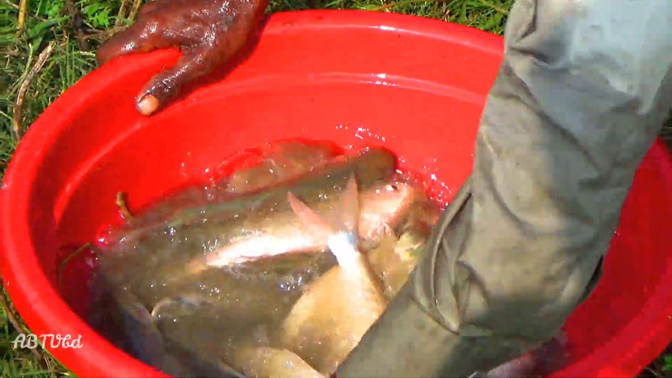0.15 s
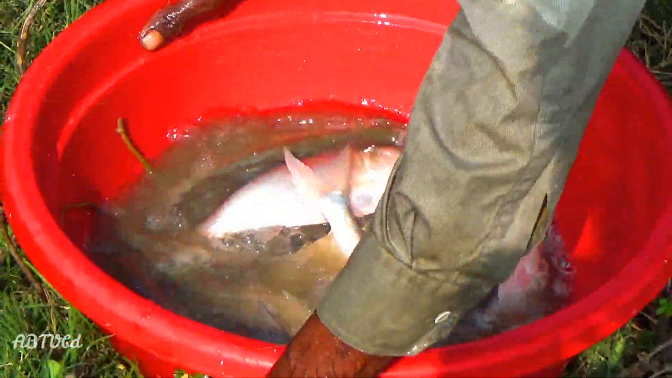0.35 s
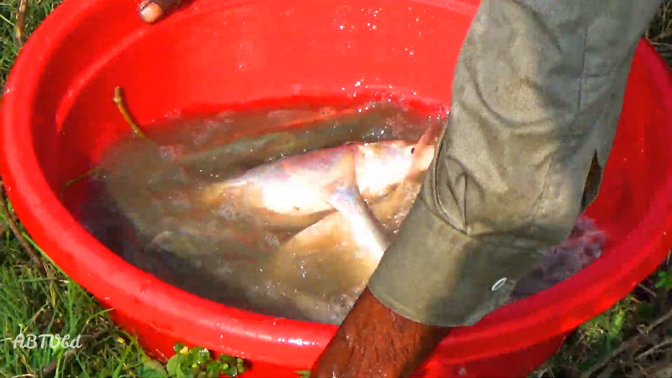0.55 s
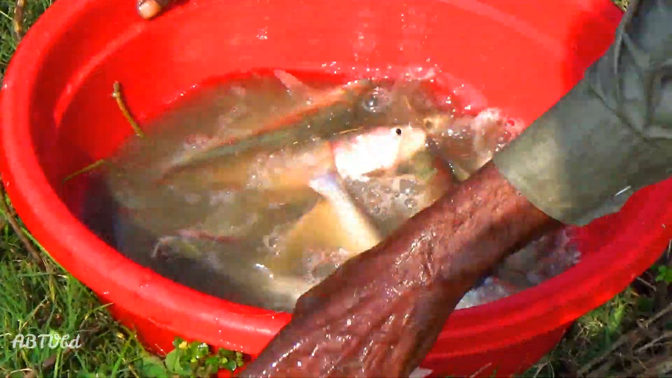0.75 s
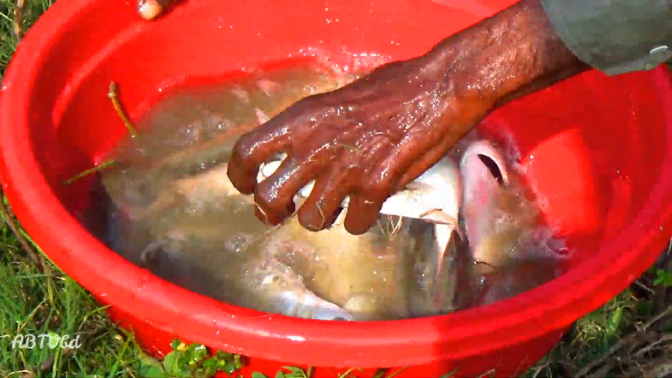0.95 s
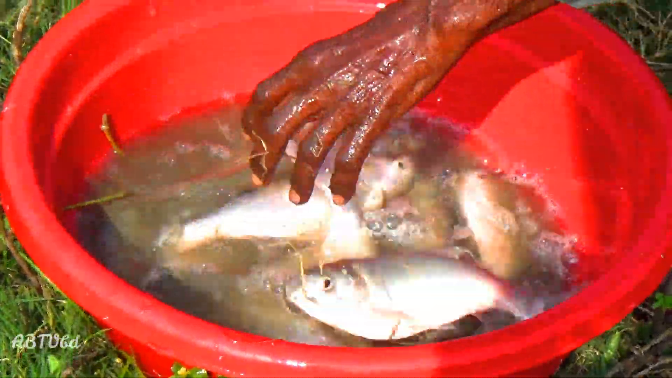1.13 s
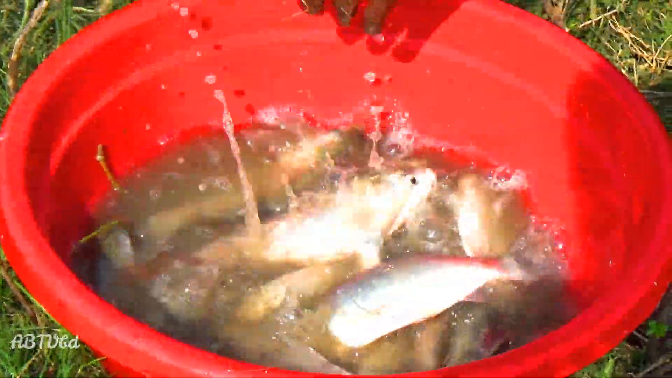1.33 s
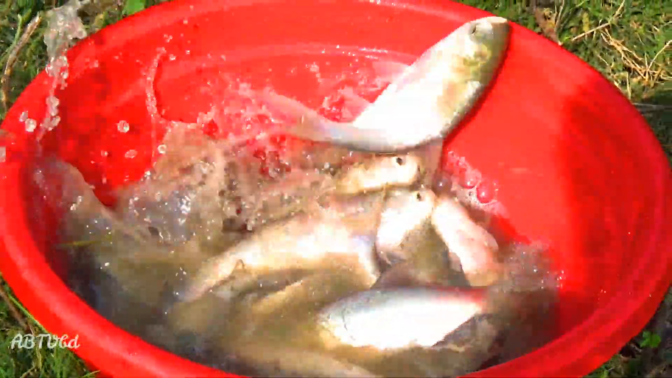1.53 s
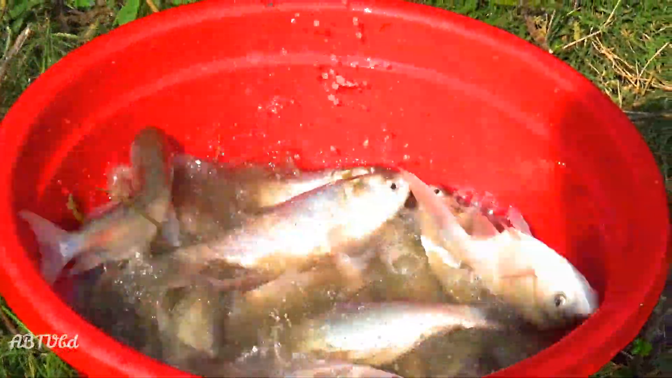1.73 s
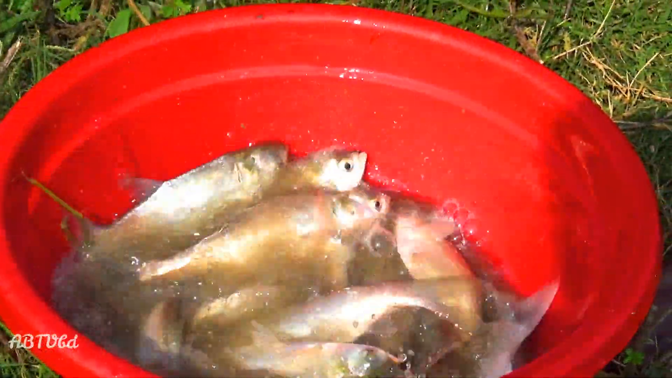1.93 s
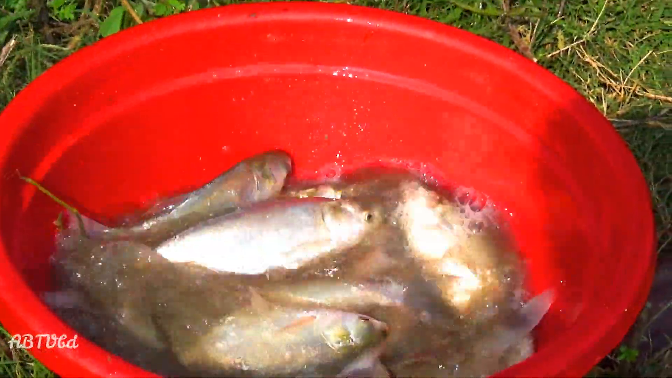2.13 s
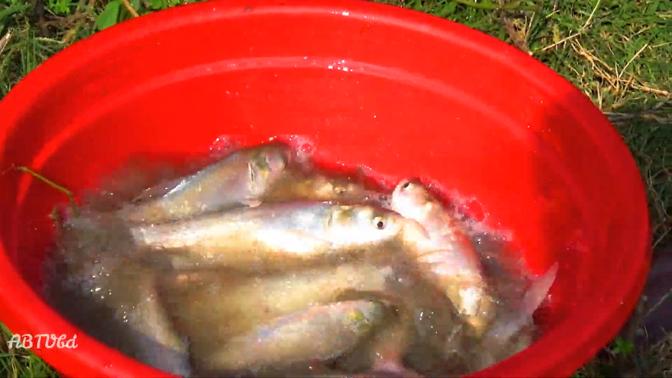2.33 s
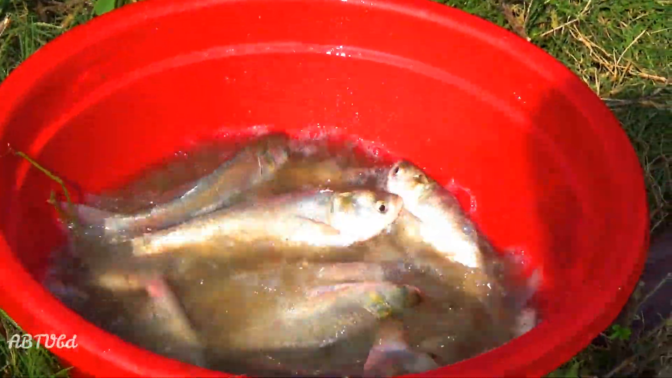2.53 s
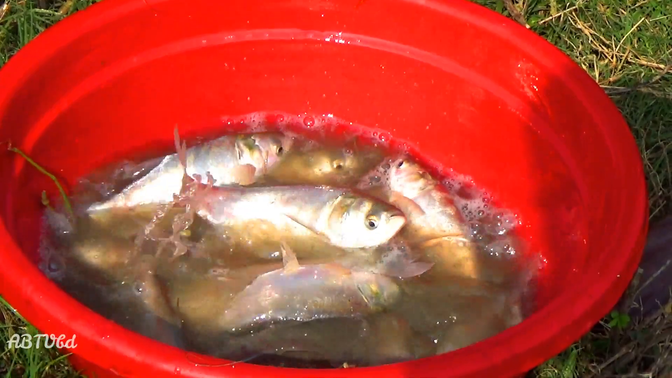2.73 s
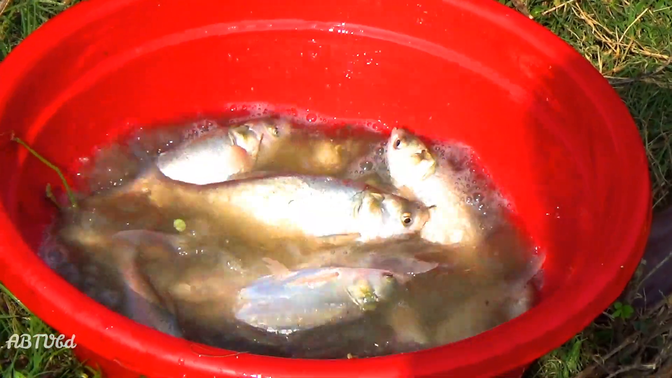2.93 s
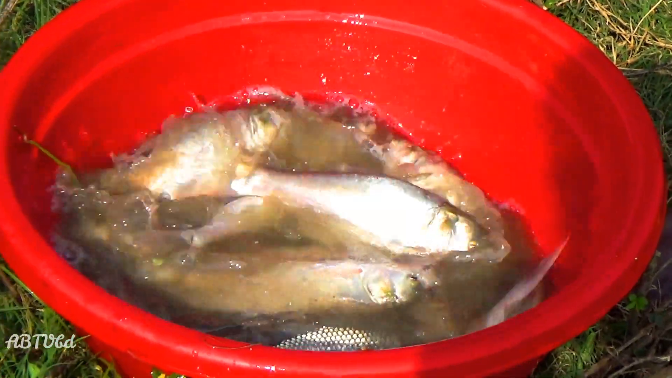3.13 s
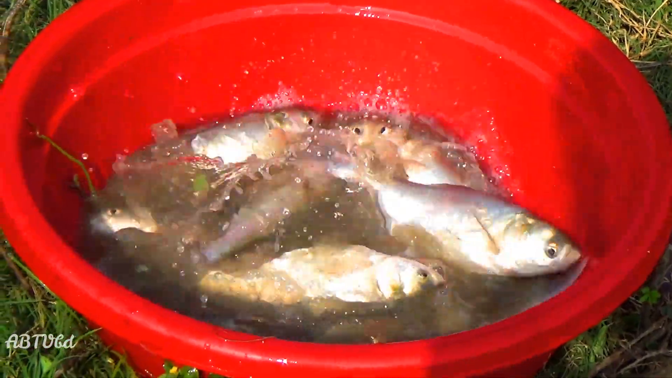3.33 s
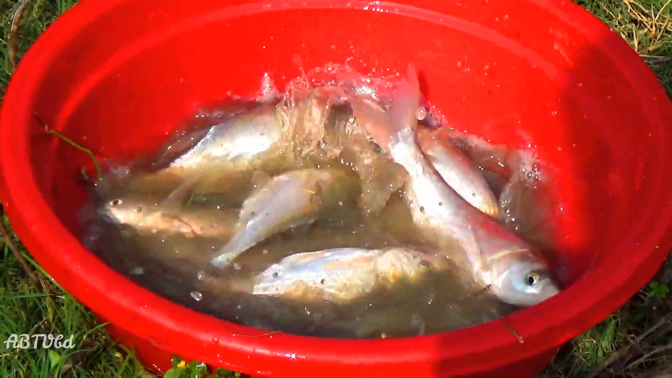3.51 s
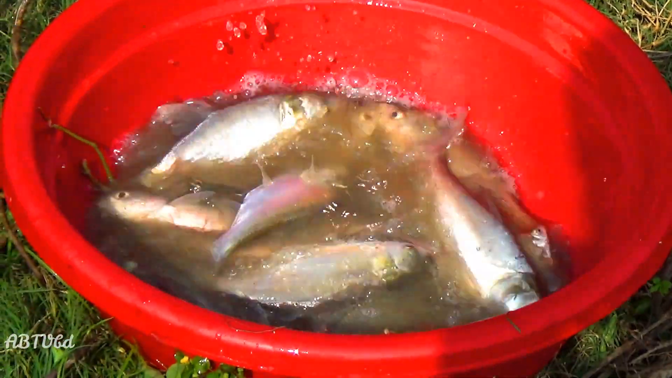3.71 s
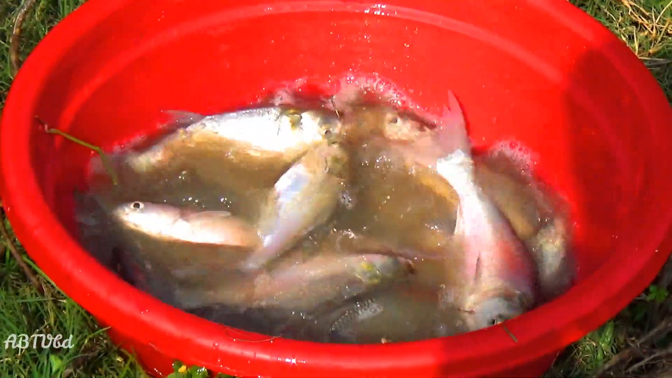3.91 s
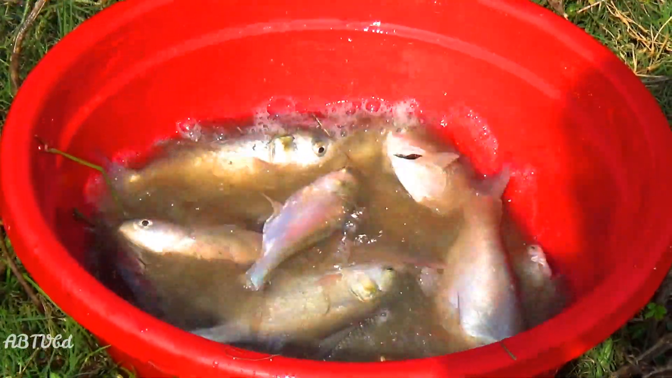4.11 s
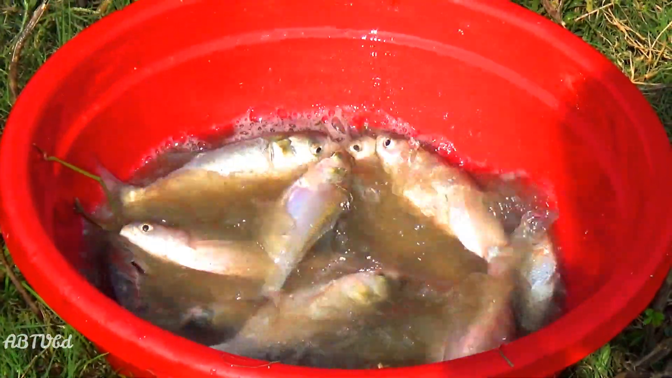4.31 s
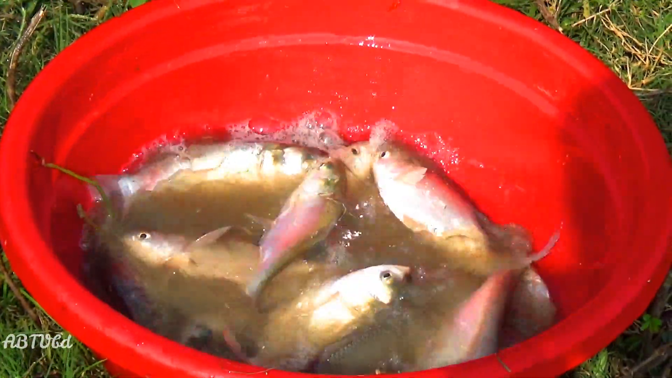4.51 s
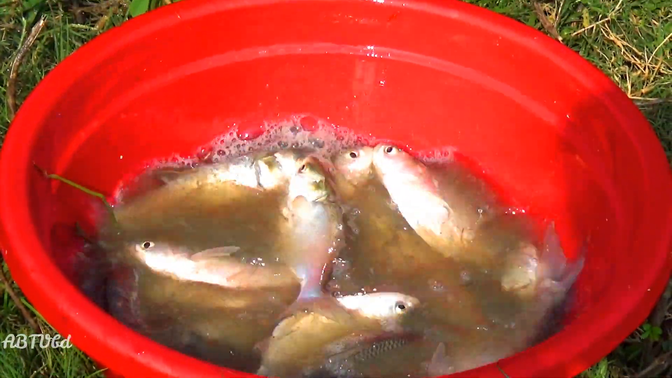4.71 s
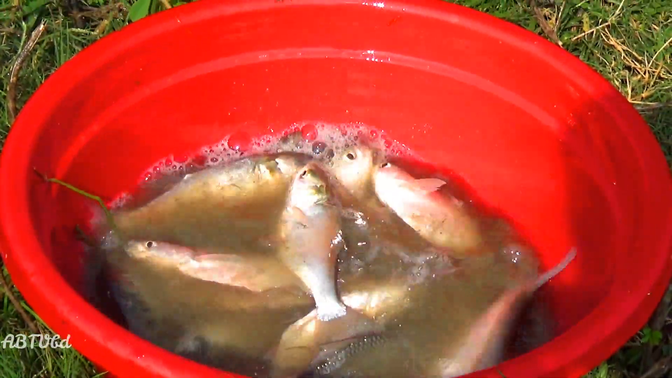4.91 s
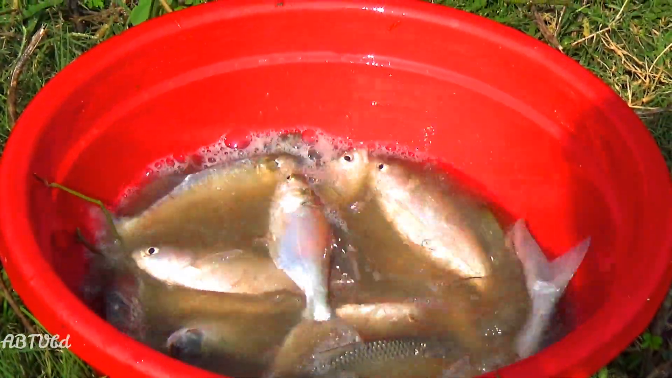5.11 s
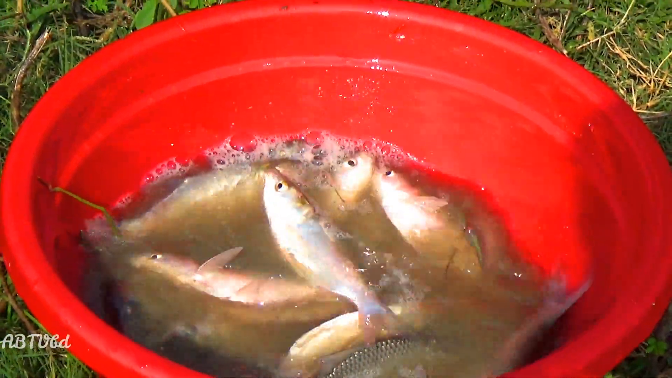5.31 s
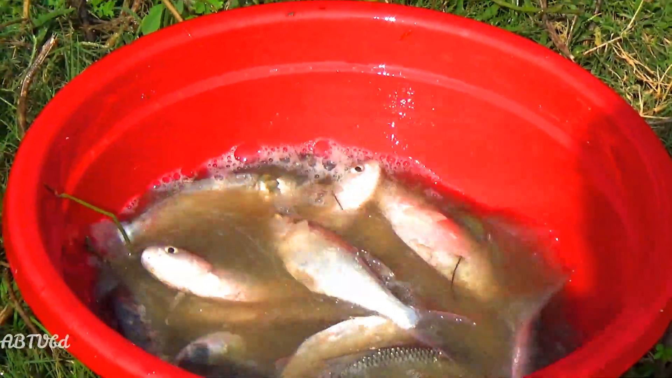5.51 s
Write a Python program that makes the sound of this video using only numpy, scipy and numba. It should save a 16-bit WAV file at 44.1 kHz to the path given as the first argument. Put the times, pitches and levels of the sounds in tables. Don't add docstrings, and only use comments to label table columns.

```python
import sys
import numpy as np
from scipy import signal
from scipy.fft import rfft, irfft, next_fast_len
from scipy.io import wavfile
from scipy.ndimage import uniform_filter1d
from numba import njit

SR = 44100
rng = np.random.default_rng(int(sys.argv[2]) if len(sys.argv) > 2 else 0)


def to_wav(s):
    ch = np.atleast_2d(s).T
    pcm = np.round(np.clip(ch, -1, 1) * 32767)
    wavfile.write(sys.argv[1], SR, pcm.astype(np.int16))


def makeup_ratio(level_db):
    decades = np.asarray(level_db, float) / 20
    return 10 ** decades


N = 244965


def unit(x):
    return x / np.sqrt(np.mean(x ** 2))


def colour(x, points):
    size = next_fast_len(N)
    hz, db = np.transpose(points)
    bin_hz = np.arange(size // 2 + 1) * SR / size
    gain = makeup_ratio(np.interp(np.log(bin_hz + 1), np.log(hz), db, -90, -90))
    return unit(irfft(rfft(x, size) * gain, size)[..., :N])


def curves(table):
    s, *columns = np.transpose(table)
    return [np.interp(np.arange(N) / SR, s, c) for c in columns]


def walk(rate_hz):
    hold = int(SR / rate_hz)
    levels = np.repeat(rng.standard_normal(N // hold + 1), hold)
    return 1.7 * uniform_filter1d(uniform_filter1d(levels, hold), hold)[:N]


def steady(x, span_s):
    span = int(span_s * SR)
    power = uniform_filter1d(uniform_filter1d(np.mean(x ** 2, axis=0), span), span)
    return x / np.sqrt(power)


def hiss(side, side_hz):
    mid, other = rng.standard_normal((2, N))
    other = signal.sosfilt(signal.butter(1, side_hz, fs=SR, output="sos"), other)
    return mid + side * other * np.array([[1], [-1]])


def resonance(x, hz, width_hz):
    f = np.arange(1, x.shape[1] // 2 + 2) * SR / x.shape[1]
    return irfft(rfft(x) / (1 + 1j * (f - hz ** 2 / f) / width_hz), x.shape[1])


def place(rows, s, db, pan_db):
    out = np.zeros((2, N + rows.shape[1]))
    gains = makeup_ratio(db) / np.abs(rows).max(axis=1)
    for row, start_s, gain, pan in zip(rows, s, gains, pan_db):
        i = int(start_s * SR)
        out[:, i:i + len(row)] += row * gain * makeup_ratio([[pan / 2], [-pan / 2]])
    return out[:, :N]


# time in seconds, rumble in dB, flutter in dB above the rumble.
GUSTS = [(0.0, -34, 3.5), (0.1, -30, 0), (0.3, -30.5, -3.5), (0.85, -31.5, -6), (1.1, -38.5, 1.5),
         (1.42, -29, -7), (1.75, -32.5, -0.5), (1.92, -30, -4), (2.44, -30.5, -3.5), (2.54, -36, -4.5),
         (2.87, -42.5, -8), (3.3, -28.5, -7), (3.65, -43.5, -9.5), (3.81, -34.5, -8.5), (4.1, -46.5, -6.5),
         (4.6, -42.5, -8.5), (5.0, -40, -7), (5.55, -41.5, -13.5)]
# Hz, dB per Hz.
RUMBLE = [(11, -45), (18, -8.5), (64, 5.5), (97, 2), (130, -8.5), (170, -66), (290, -120)]
# Hz, dB per Hz.
FLUTTER = [(59, -36), (100, -1.5), (132, -0.5), (292, -19.5), (441, -30.5), (600, -35.5), (780, -37),
           (1320, -120)]
# start in seconds, peak in dB, pitch in Hz, left minus right in dB.
BUMPS = [
    (0.07, -28, 173, -2),
    (.845, -17.5, 94, 3),
    (.884, -18.5, 110, -2),
    (4.58, -28.5, 199, 1),
    (1.668, -21, 164, -2),
    (1.788, -16, 171, 12),
    (2.506, -23.5, 172, -7),
]


def wind():
    eddy_lag_s = 0.0011
    rumble_db, flutter_db = curves(GUSTS)
    rumble = steady(colour(hiss(0.2, 2000), RUMBLE), 0.07)
    flutter = steady(colour(hiss(0.51, 2000), FLUTTER), 0.058)
    flutter = flutter * makeup_ratio(flutter_db + 1.54 + 1.91 * walk(22.546))
    right, left = (rumble + flutter) * makeup_ratio(rumble_db + 1.2 + 1.6 * walk(16))
    left = np.interp(np.arange(N) - eddy_lag_s * SR, np.arange(N), left)
    s, db, hz, pan_db = np.transpose(BUMPS)
    turn = hz[:, None] * np.arange(1024) / SR
    bump = np.sin(2 * np.pi * turn) * turn * np.exp(-turn / 0.28)
    return np.array([left, right]) + place(bump, s, db - 0.5, pan_db)


# start in seconds, hold in seconds, spray in dB, gurgle in dB.
BOUTS = [(-.02, 0.097, -44, -46), (0.289, 0.049, -45, -59), (1.08, 0.015, -56, -46),
         (1.185, 0.039, -41, -42), (1.302, 0.088, -46, -55), (1.384, 0.019, -43, -37),
         (1.456, 0.15, -41, -48), (1.68, 0.21, -44.5, -41.5), (1.903, 0.2, -48.5, -55.5),
         (2.403, 0.41, -56.5, -62), (2.872, 0.28, -46.5, -56), (3.192, 0.11, -50.5, -57),
         (3.365, 0.05, -38, -46.5), (3.506, 0.11, -48.5, -49), (3.782, 0.076, -50, -58),
         (3.996, 0.11, -47.5, -58), (4.138, 0.052, -43.5, -51.5), (4.293, 0.15, -48, -61),
         (4.606, 0.12, -48, -54.5), (4.768, 0.11, -54, -50.5), (4.945, 0.1, -49.5, -56),
         (5.177, 0.052, -50, -50.5), (5.44, 0.024, -47.5, -54), (5.51, .1, -41.5, -50.5)]
# start in seconds, hold in seconds, spray in dB, gurgle in dB.
BEATS = [(0.56, 0.207, -52, -76), (1.447, 0.014, -28, -34), (1.476, 0.047, -29.5, -28.5),
         (1.561, 0.01, -28.5, -30.5), (1.606, 0.019, -25, -29.5), (1.657, 0.012, -31.5, -35),
         (1.708, 0.016, -33, -35), (1.758, 0.014, -32.5, -41), (1.788, 0.029, -33.5, -33.5),
         (1.824, 0.011, -35.5, -39), (1.856, 0.0075, -37, -36), (3.201, .018, -40, -45),
         (3.289, 0.02, -39, -48.5), (3.404, 0.047, -50, -40), (3.507, 0.013, -36, -39)]


def stirring(broken):
    rise_db_s, foam_fall_db_s, drop_fall_db_s, beat_fall_db_s = 424, 57, 115, 553
    calm_db = -58
    s, hold, spray_db, gurgle_db = (c[:, None] for c in np.transpose(BOUTS + BEATS))
    grid_s = np.arange(0, N, 64) / SR
    t = grid_s - s
    ends = np.clip((s + hold) * SR, 0, N - 1).astype(int)
    fall = foam_fall_db_s + (drop_fall_db_s - foam_fall_db_s) * broken[ends]
    fall[len(BOUTS):] = beat_fall_db_s
    shape = makeup_ratio(2 * (rise_db_s * np.minimum(t, 0) - fall * np.maximum(t - hold, 0)))
    levels = []
    for db in (spray_db, gurgle_db):
        power = (shape * makeup_ratio(2 * db)).sum(axis=0) + makeup_ratio(2 * calm_db)
        levels.append(np.interp(np.arange(N) / SR, grid_s, 10 * np.log10(power)))
    return levels


@njit
def grains(start, hz, turns, big, glide, pan):
    out = np.zeros((2, N))
    for k in range(len(start)):
        z = big[k] + 0j
        n = int(turns[k] * SR / hz[k]) + 2
        step = np.exp((2j * np.pi - 1 / turns[k]) * hz[k] / SR)
        climb = np.exp(2j * np.pi * hz[k] / SR * glide / n)
        for i in range(start[k], min(start[k] + 5 * n, N)):
            z = z * step
            step = step * climb
            out[0, i] += z.imag * (1 + pan[k])
            out[1, i] += z.imag * (1 - pan[k])
    return out


def froth(count, low_hz, high_hz, turns, scatter_db, glide, wide):
    u = rng.random((count, 5)).T
    start = (u[0] * N).astype(np.int64)
    hz = low_hz * (high_hz / low_hz) ** u[1]
    big = makeup_ratio(-scatter_db * np.log(0.995 * u[2] + 0.005)) * hz
    pan = wide * np.sqrt(low_hz / hz) * (2 * u[4] - 1)
    return unit(grains(start, hz, turns * (0.66 + u[3]), big, glide, pan))


# time in seconds, share 0-1.
BROKEN = [
    (0, 0.27),
    (.25, 0.24),
    (1.05, 0.5),
    (1.25, 0.9),
    (1.45, 0.85),
    (1.85, 0.74),
    (2.95, 0.76),
    (3.3, 0.86),
    (5.55, 0.82),
]
# Hz, dB per Hz.
SPRAY = [(1760, -26), (3000, -7.5), (3630, -7), (4460, -3), (6740, -3), (9740, 1.5), (12100, -12),
         (15300, -24), (16400, -39)]
# Hz, dB per Hz.
FOAM = [(1470, -56), (2500, -31), (4470, -8), (7000, -3), (9000, 3), (11500, -3.5), (16400, -19)]
# Hz, dB per Hz.
GURGLE = [(310, 0), (520, -11), (707, -4.5), (1160, -7.5), (1650, -5), (2520, -2.5), (4000, -14.5),
          (5200, -12), (8800, -120)]


def churn():
    (broken,) = np.clip(curves(BROKEN), 0, 1)
    spray_db, gurgle_db = stirring(broken)
    patch = walk(60) * broken
    drops = froth(count=9000, low_hz=2500, high_hz=17400, turns=4.8, scatter_db=3.1, glide=0.085, wide=0.33)
    drops = colour(drops, SPRAY)
    foam = colour(hiss(0.25, 5000), FOAM) * makeup_ratio(0.9 * walk(30))
    spray = np.sqrt(broken) * drops + np.sqrt(1 - broken) * foam
    gurgle = froth(count=5000, low_hz=500, high_hz=6000, turns=3.2, scatter_db=2.2, glide=0.05, wide=0.8)
    gurgle = colour(gurgle + 0.98 * hiss(0.27, 2000), GURGLE)
    spray_db = spray_db + 2.1 * patch
    gurgle_db = gurgle_db + 1.4 * patch + 1.2 * walk(25) - 0.5
    return spray * makeup_ratio(spray_db) + gurgle * makeup_ratio(gurgle_db)


# start in seconds, peak in dB.
SNAPS = [(0.033, -15.5), (5.4645, -21), (1.172, -15), (1.2392, -14), (1.559, -6.5), (1.667, -16),
         (1.8657, -6), (2.1821, -14), (2.2176, -9), (2.5285, -14), (3.1692, -19), (3.1887, -18),
         (3.4075, -12), (3.4726, -14), (2.565, -26.5), (3.5705, -12), (3.8274, -15), (3.9666, -10.5),
         (3.977, -11.5), (3.941, -24), (3.999, -23), (4.011, -22), (4.107, -21), (4.199, -12.5),
         (4.24, -22), (4.286, -17), (4.344, -20.5), (4.1798, -8.5), (4.017, -12), (4.0343, -8),
         (4.0887, -6.5), (4.1288, -16), (4.28, -12), (4.3154, -12), (4.715, -17.5), (5.066, -17.5),
         (5.1795, -6), (5.183, -10), (5.2236, -10.5)]
# peak time in seconds, peak in dB, centre in Hz,
# gap in seconds, fall in dB a crack.
FLICKS = [(1.188, -7, 8000, 0.005, 3.5), (1.394, -10, 8350, 0.0056, 15), (1.51, -8, 7250, 0.003, 3.5),
          (1.609, -8, 8800, 0.0033, 3), (1.631, -11, 6860, 0.0056, 5.5), (1.679, -7, 6560, 0.0062, 17),
          (1.7777, -9.5, 7800, 0.0052, 3.5), (1.8079, -12, 4700, 0.012, 5), (2.3381, -15, 6300, 0.0031, 9),
          (2.907, -16.5, 7050, 0.0037, 18), (3.0523, -14, 8250, 0.011, 9), (3.137, -8.5, 9900, 0.0045, 17),
          (3.214, -11, 7600, .0026, 20), (3.373, -3, 9300, 0.0026, 15), (3.4164, -10, 7350, 0.004, 16),
          (3.6058, -13, 5500, .0035, 12), (4.048, -4.5, 7400, 0.0033, 4), (4.076, -8, 7860, 0.0056, 19),
          (4.1396, -8.5, 8060, 0.0069, 19), (4.1696, -3.5, 7040, 0.01, 9), (4.668, -11.5, 8300, 0.0066, 20),
          (5.203, -8.5, 8600, .004, 15), (5.4994, -6, 5940, 0.0054, 4.5), (5.5464, -8, 8200, 0.0087, 9)]
# start in seconds, peak in dB, centre in Hz.
DROPS = [(5.4848, -22, 8000), (0.543, -24.5, 6800), (0.692, -29, 3730), (1.2932, -18.5, 4800),
         (1.39, -12, 6250), (1.836, -9.5, 6200), (2.2849, -18.5, 7500), (2.3016, -20, 7600),
         (2.438, -20.5, 8650), (2.4608, -24, 8600), (2.5385, -22, 5660), (2.6828, -22, 6700),
         (3.0956, -22, 7400), (3.241, -23, 6040), (3.6407, -20.5, 4900), (3.6716, -18.5, 8750),
         (3.814, -22, 5900), (4.1167, -16, 8700), (4.2317, -19, 8700), (2.412, -26, 8000),
         (4.4195, -18, 8000), (4.4768, -22.5, 5230), (4.536, -19.5, 7600), (4.592, -16, 6560),
         (4.732, -18, 9000), (4.9485, -19, 5770), (4.9836, -19.5, 7900), (5.218, -18, 9500),
         (5.399, -25, 8360), (5.4566, -21.5, 7330)]
# start in seconds, peak in dB, pitch in Hz, peak of the crack on top in dB.
SLAPS = [(.191, -24, 3520, -18), (.224, -23, 1200, -18.5), (.355, -26, 1996, -21), (.805, -35, 1320, -28),
         (.854, -39.5, 2270, -31), (1.1845, -27, 4740, -8), (1.399, -21, 2670, -26),
         (1.435, -26, 1500, -26), (1.442, -28.5, 810, -32), (1.511, -19.5, 1940, -14),
         (1.516, -31, 694, -8), (1.608, -25.5, 1010, -15), (1.707, -24.5, 373, -30),
         (1.806, -24, 3070, -25), (1.864, -24, 890, -15), (3.2095, -26, 3090, -30),
         (3.214, -26.5, 2410, -17), (3.32, -34, 2250, -32), (3.37, -29.5, 2580, -23),
         (3.4285, -25, 1390, -28), (3.5222, -28.5, 2580, -26), (3.697, -33, 3240, -17),
         (3.854, -29.5, 2520, -22), (3.947, -33, 2600, -17.5), (4.038, -36.5, 1135, -28),
         (4.495, -40, 2870, -34), (3.302, -28, 2500, -26), (5.043, -46, 2070, -13),
         (5.278, -30.5, 1540, -30), (5.511, -33, 2100, -22)]


def cracks():
    lead_db, slap_crack_late_s, slap_crack_hz = -7.5, 0.001168, 5500
    s, db, hz, gap_s, fall_db = np.transpose(FLICKS)
    k = np.arange(-1, 4)[:, None]
    run_s = s + k * gap_s
    run_db = db + np.where(k < 0, lead_db, -k * fall_db)
    run_hz = hz * (1 + 0.061 * (k != 0) * rng.standard_normal((len(s), 5)).T)
    runs = np.reshape((run_s, run_db, run_hz), (3, -1))
    film_hz = 8600 * (1 + 0.12 * rng.standard_normal(len(SNAPS)))
    slap_s, _, _, top_db = np.transpose(SLAPS)
    tops = slap_s + slap_crack_late_s, top_db, np.full(len(SLAPS), slap_crack_hz)
    rows = np.hstack([runs, [*np.transpose(SNAPS), film_hz], np.transpose(DROPS), tops])
    return np.minimum(rows, [[N / SR], [0], [SR / 4]])


def snaps():
    mic_hz, mic_width_hz, mic_band_hz = 9600, 2500, (3500, 11100)
    s, db, hz = (c[:, None] for c in cracks())
    t = np.arange(2048) / SR
    chance = rng.standard_normal((len(s), 3, len(t)))
    crackle = chance[:, 0] * makeup_ratio(5.2 * uniform_filter1d(chance[:, 1], size=9) * 4.13)
    t60_s = np.clip(0.014 + 0.00033 * db, 0.004, 0.05)
    rows = crackle * makeup_ratio(-60 * t / t60_s) * 0.32
    rows *= 0.058 + 0.75 * (1 - np.exp(-t / 0.0009))
    rows[:, 12] = 1.9 * np.sign(chance[:, 2, 0])
    rows = resonance(rows, hz, 0.5 * hz) + 0.88 * resonance(rows, mic_hz, mic_width_hz)
    rows = resonance(rows, hz, 2 * hz)
    band = signal.butter(2, mic_band_hz, "bandpass", fs=SR, output="sos")
    rows = signal.sosfilt(band, rows)
    return place(rows, s[:, 0], db[:, 0] - 0.7, 0.7 * chance[:, 2, 1] + 0.55)


# start in seconds, peak in dB, pitch in Hz, t60 in seconds.
BUBBLES = [(.069, -34, 855, 0.036), (.123, -41, 1460, .04), (.153, -26.5, 1360, 0.048),
           (.222, -30, 2190, 0.034), (1.099, -33, 2196, 0.041), (1.169, -38, 2820, 0.035),
           (1.186, -22, 1976, 0.036), (1.211, -37, 3380, 0.028), (1.464, -34, 1224, 0.046),
           (1.48, -25, 680, 0.051), (1.514, -28.5, 2610, .053), (1.552, -25, 1126, 0.034),
           (1.787, -28, 2720, 0.038), (1.812, -29.5, 1267, 0.043), (2.142, -33, 2320, 0.032),
           (2.751, -41.5, 3170, 0.035), (3.424, -36, 2470, 0.023), (3.435, -37.5, 623, 0.056),
           (3.761, -38.5, 840, 0.036), (3.771, -37, 1520, 0.04), (3.782, -43, 2030, 0.055),
           (3.839, -42, 1900, 0.068), (4.332, -38, 4480, 0.026), (4.75, -45, 1970, 0.035),
           (4.849, -42, 4020, 0.03), (4.984, -41.5, 474, 0.07), (5.051, -34.5, 1200, 0.036),
           (5.106, -42, 5260, 0.023), (5.498, -29.5, 3830, 0.063), (5.5, -25, 3110, 0.04)]


def pockets(count=24):
    from_s, low_hz, high_hz = 1.9, 1200, 4200
    u = rng.random((2, count))
    trickle_s = from_s + u[0] * (N / SR - from_s)
    trickle_hz = low_hz * (high_hz / low_hz) ** u[1]
    trickle = [trickle_s, np.full(count, -52.5), trickle_hz, np.full(count, 0.036)]
    slaps = [*np.transpose(SLAPS)[:3], np.full(len(SLAPS), 0.024)]
    return np.hstack([slaps, np.transpose(BUBBLES), trickle])


def plops():
    s, db, hz, t60_s = (c[:, None] for c in pockets())
    t = np.arange(4096) / SR
    chance = rng.standard_normal((len(s), 2, len(t)))
    t60_s = np.clip(t60_s, 0.006, 0.06)
    wobble = 0.012 * np.cumsum(uniform_filter1d(chance[:, 1], size=40), axis=1) * hz / 1000
    swell = (1 - np.exp(-t / 0.0018)) * makeup_ratio(-40 * t / t60_s) * np.exp(-(3.76 * t / t60_s) ** 2)
    bubble = np.sin(2 * np.pi * hz * t * (1 + 2.4 * t) + wobble) * swell
    slap = chance[:, 0] * makeup_ratio(-60 * t / 0.022) * (1 - np.exp(-t / 0.00046))
    slap = resonance(slap, hz, 0.5 * hz) + 0.32 * resonance(slap, 0.67 * hz, 0.63 * hz)
    slap = resonance(slap, hz, 2.7 * hz)
    slap = slap / np.abs(slap).max(axis=1, keepdims=True)
    ring = np.clip(t60_s / 0.054, 0, 0.9)
    rows = ring * bubble + (1 - ring) * slap
    return place(rows, s[:, 0], db[:, 0] + 5.0, 2.0 * chance[:, 0, -1] + 0.1)


# centre in
# seconds, peak in dB, pitch in Hz.
BLIPS = [(1.091, -36.5, 664), (1.1, -40, 746), (1.305, -33, 4370), (1.319, -34, 4200), (.566, -39, 4200),
         (1.102, -37.5, 353), (1.188, -34, 2800), (1.188, -29, 4260), (1.262, -36, 1990),
         (1.202, -34, 3230), (1.247, -35, 815), (1.293, -34, 2570), (1.294, -36, 6100),
         (1.374, -34.5, 1370), (1.395, -27, 4550), (3.265, -40, 3100), (1.479, -32, 2630),
         (1.483, -22, 1200), (1.502, -25, 1850), (1.514, -23, 4390), (1.516, -21, 4730), (1.571, -26, 2580),
         (1.613, -26, 4390), (1.616, -23, 2780), (1.616, -24, 2010), (1.64, -29, 2710),
         (1.672, -28.5, 2040), (1.674, -30, 2600), (1.701, -30, 1850), (1.705, -33, 3100),
         (1.716, -33, 3250), (1.719, -27, 1900), (1.73, -29, 730), (1.786, -29, 900), (1.792, -31, 1980),
         (1.794, -34.5, 403), (1.801, -31, 1240), (1.809, -29, 1810), (1.811, -20.5, 4370),
         (1.836, -26, 4820), (1.85, -30, 3350), (1.866, -31, 4390), (1.866, -26, 4800), (1.866, -39, 2280),
         (3.202, -29, 2390), (3.412, -27, 5500), (.205, -27.5, 7600), (3.306, -40, 1250),
         (3.324, -29.5, 2470), (3.372, -44, 2540), (3.372, -33.5, 1160), (3.241, -26, 5760),
         (3.43, -38, 560), (3.513, -39, 860), (3.524, -24.5, 2440), (3.528, -42, 950), (3.576, -35, 3450),
         (3.591, -31.5, 2740), (3.605, -40, 4300), (3.608, -35, 2600),
         (0.229, -42, 1260), (0.358, -35, 3130), (0.359, -36.5, 876), (0.387, -46, 380), (0.692, -41, 2530),
         (0.855, -39, 4610), (0.856, -45, 1890), (1.986, -37, 2950), (1.993, -38.5, 1850),
         (2.14, -41, 1880), (2.205, -43.5, 398), (2.22, -36, 5000), (2.34, -28, 5200), (2.521, -43, 820),
         (2.53, -44, 2580), (2.539, -30, 5170), (2.685, -41, 4030), (.136, -34, 5340), (2.95, -40.5, 1200),
         (2.953, -41.5, 860), (3.131, -37, 2580), (3.643, -36, 3450), (3.784, -38, 1980),
         (3.814, -38, 4900), (3.855, -41, 4550), (3.887, -41, 3400), (3.46, -35, 4500), (3.981, -41, 1220),
         (4.171, -31, 4500), (4.173, -38.5, 2480), (4.318, -43, 5000), (4.323, -37, 2800),
         (4.336, -39, 3140), (4.349, -30, 4530), (4.421, -41, 5170), (4.716, -34, 5300), (4.478, -36, 5030),
         (4.497, -38.5, 2550), (4.659, -34.5, 2370), (4.684, -39.5, 1800), (4.857, -39.5, 2880),
         (4.974, -40, 3620), (5.016, -37, 3620), (5.05, -45, 3720), (5.051, -35.5, 740),
         (5.051, -34.5, 2150), (5.109, -38, 5120), (5.182, -33, 5140), (5.252, -37, 3140),
         (5.28, -32, 3550), (5.282, -35, 1220), (5.282, -35, 5040), (5.281, -33, 4610), (5.452, -40, 2300),
         (5.097, -40, 1550), (5.501, -24, 4940), (5.192, -43, 1850), (5.515, -23, 3700), (5.517, -28, 3160),
         (5.52, -35.5, 1210),
         (1.976, -40, 1430), (2.045, -39, 1300), (2.087, -38.5, 2810), (2.1, -44, 1740), (2.163, -44, 2040),
        (2.423, -44, 2090), (2.438, -43, 2700), (2.475, -45, 830), (2.5, -42, 800), (4.592, -44, 1250),
        (4.614, -43, 885), (4.748, -41, 2930), (4.792, -39.5, 1350), (4.924, -46, 2090), (3.332, -32, 2180),
        (1.519, -30, 700)]


def blips():
    s, db, hz = (c[:, None] for c in np.transpose(BLIPS))
    chance = rng.standard_normal((len(s), 2))
    half_s = (0.0026 + 5 / hz) / 2
    before = 512
    t = np.arange(-before, 1024) / SR
    swell = np.exp(-(t / np.where(t < 0, 0.65 * half_s, 1.12 * half_s)) ** 2)
    climb = 0.05 * (1 + 0.5 * chance[:, :1]) * t / half_s / 2
    rows = swell * np.sin(2 * np.pi * hz * t * (1 + climb))
    return place(rows, s[:, 0] - before / SR, db[:, 0] - 0.5, 1.2 * chance[:, 1] + 0.3)


# start in seconds, peak in dB, from Hz, to Hz, length in seconds.
BURP = (3.779, -36, 1800, 3200, .018)


def burp():
    s, db, from_hz, to_hz, length_s = BURP
    hz = np.linspace(from_hz, to_hz, int(length_s * SR))
    sweep = np.sin(2 * np.pi * np.cumsum(hz) / SR) * np.hanning(len(hz))
    return place(sweep[None], [s], [db], [1])


def basin(water):
    t = np.arange(3000) / SR
    echo = hiss(0.82, 4900)[:, :len(t)] * makeup_ratio(-60 * t / 0.051 - 33.0) * (t > 0.0007)
    return signal.fftconvolve(water, echo, axes=1)[:, :N]


# Hz, dB per Hz.
FIELD = [(150, 7), (250, 1), (642, -7), (896, -5), (1490, -13), (3630, -22), (10200, -20.5), (16300, -39)]


def field():
    return makeup_ratio(-49) * colour(hiss(0.64, 6100), FIELD)


def scene():
    water = snaps() + plops() + blips() + burp()
    return water + basin(water) + churn() + wind() + field()


def band_limit(x):
    return signal.sosfilt(signal.butter(12, 16500, fs=SR, output="sos"), x)


def record(dry):
    low_pass = signal.ellip(8, 0.2, 70, 15650, fs=SR, output="sos")
    mix = signal.sosfilt(low_pass, dry)
    return band_limit(mix)


dry = scene()
out = record(dry)
to_wav(out)
```